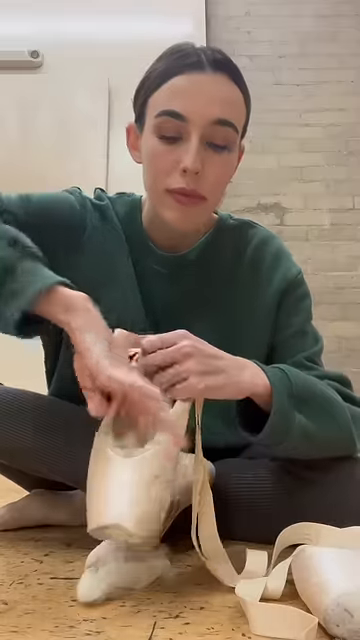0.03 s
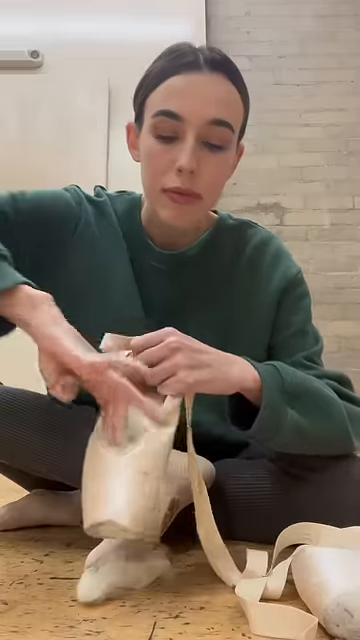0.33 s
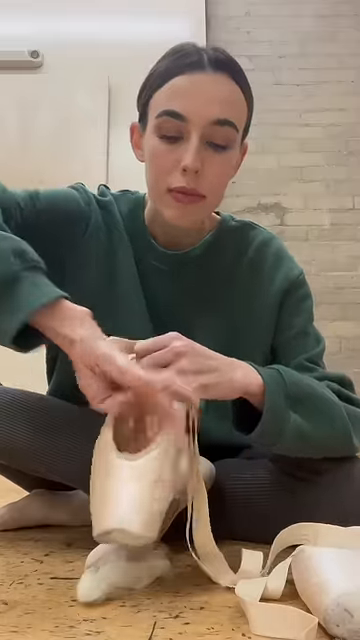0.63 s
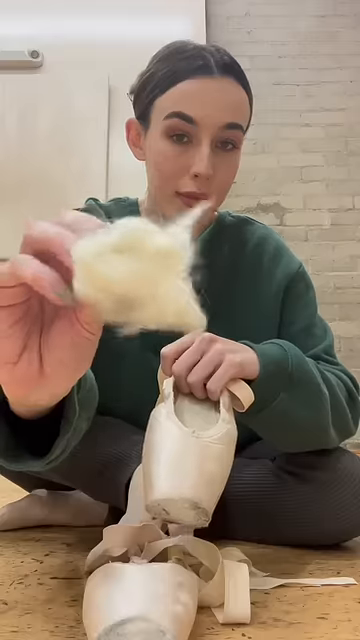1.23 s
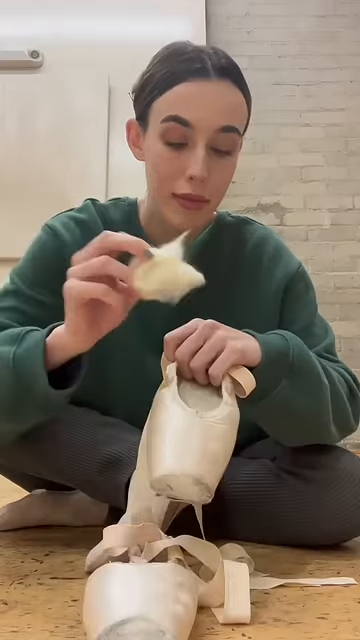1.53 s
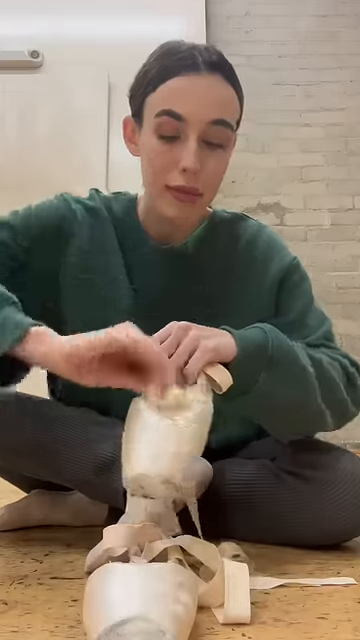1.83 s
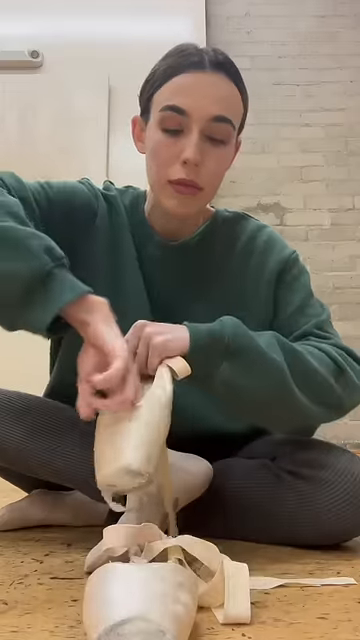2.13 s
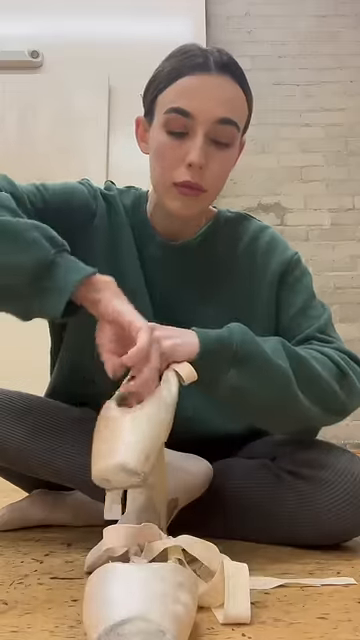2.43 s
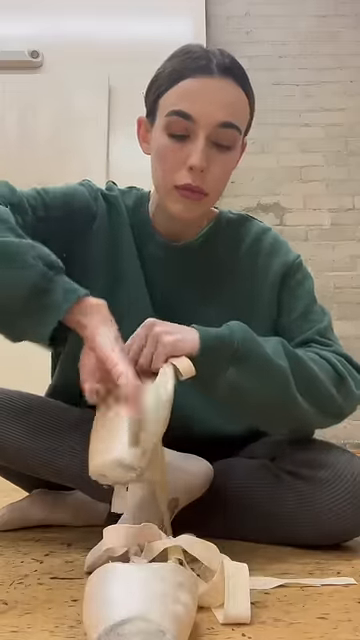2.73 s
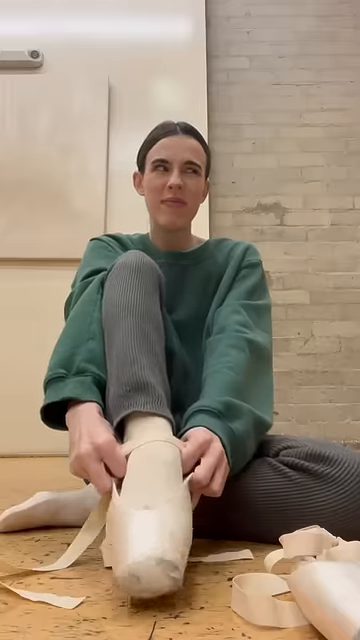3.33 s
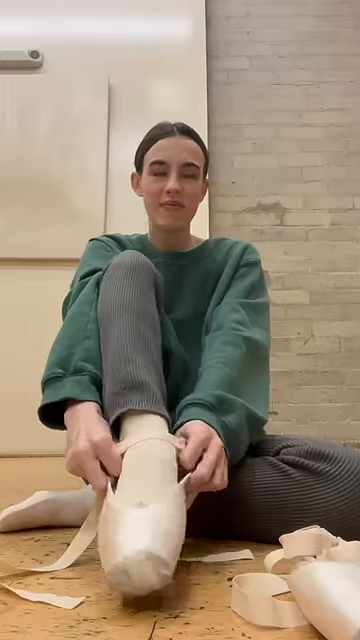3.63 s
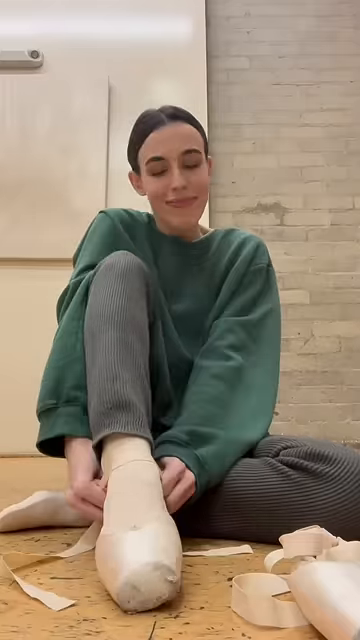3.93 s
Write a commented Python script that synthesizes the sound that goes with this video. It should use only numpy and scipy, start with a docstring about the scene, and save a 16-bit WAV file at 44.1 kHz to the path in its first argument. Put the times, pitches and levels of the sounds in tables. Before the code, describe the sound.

Close, soft rubbing and rustling comes in two spells as hands press wool into a hollow ballet shoe. Faint creaks and one low knock on floorboards follow, over the throbbing ventilation hum of a quiet room.

```python
"""Two ventilation motors hum and slowly throb while a dancer on a studio floor handles a satin pointe shoe.
Her fingers rub inside it and press wool into its hollow toe box; sleeves rustle, fingertips bump and squeak.
After a lull she rubs again. She pulls the shoe on, the fabric creaks, and the toe knocks once on the floor.
About once a second the whole sound dips briefly, and the hum comes back at another point in its throb."""
import sys
import numpy as np
from scipy import signal
from scipy.fft import rfft, irfft
from scipy.io import wavfile

SR = 44100
rng = np.random.default_rng(int(sys.argv[2]) if len(sys.argv) > 2 else 0)


def wav_out(sig):
    """Save sig, one row per channel (or a flat mono array), as 16-bit PCM at SR to the path in sys.argv[1]."""
    wavfile.write(sys.argv[1], SR, np.round(np.clip(np.atleast_2d(sig).T, -1, 1) * 32767).astype(np.int16))


N = 176400
TIME, FREQ = np.arange(N) / SR, np.fft.rfftfreq(N, 1 / SR)
FINGER_GRIP = dict(slips_per_s=900, spread_db=1, wash=0.41)
CLOTH_GRIP = dict(slips_per_s=2500, spread_db=0.5, wash=0.75)
# The stretches of sound between the dips: start_s, weakest_hum_s
STRETCHES = [(0, .47), (1.037, 1.65), (1.901, 2.5), (2.9, 3.08), (3.871, 4.33)]


def amp(db):
    """Turns decibels into a number to multiply by."""
    return 10 ** (np.asarray(db) / 20)


def evened(x):
    """Scales a sound to an average strength (rms) of 1."""
    return x / np.sqrt(np.mean(x ** 2) + 1e-20)


def curve(points):
    """Joins (frequency, value) points into a value for every frequency."""
    hz, value = np.transpose(points)
    return np.interp(np.log(FREQ + 1), np.log(hz), value)


def colour(x, tone):
    """Makes some frequencies stronger and others weaker, then evens the level."""
    return evened(irfft(rfft(x) * amp(curve(tone)), N))


def add(mix, start_s, sound):
    """Mixes a sound in at the given time."""
    part = mix[..., max(round(start_s * SR), 0):][..., :sound.shape[-1]]
    part += sound[..., :part.shape[-1]]


def resonate(x, hz, width_hz):
    """Keeps the sound near one pitch; filtering twice cuts the rest more sharply."""
    b, a = signal.iirpeak(hz, hz / width_hz, SR)
    return evened(signal.lfilter(b, a, signal.lfilter(b, a, x)))


def wander(step_s):
    """A random curve that glides to a new value every step."""
    times = np.arange(0, N / SR, step_s)
    return np.interp(TIME, times, rng.standard_normal(N)[:len(times)])


def friction(slips_per_s, spread_db, wash):
    """Rubbing: two separate streams of tiny, uneven clicks over a wash of smooth noise."""
    size = amp(spread_db * np.minimum(rng.exponential(1, (2, N)), 4))
    slips = size * rng.choice([-1, 1], (2, N)) * (rng.random((2, N)) < slips_per_s / SR)
    return evened(evened(slips) + wash * rng.standard_normal((2, N)))


def pressure(length_s):
    """A touch presses for 32% of its length, holds, and lets go over the last 40%."""
    progress = np.linspace(0, 1, int(length_s * SR))
    ramp = np.minimum(progress / 0.32, (1 - progress) / 0.4)
    return np.sin(np.pi / 2 * np.clip(ramp, 0, 1))


def stretch_index():
    """Tells which stretch each moment belongs to."""
    return np.searchsorted(np.transpose(STRETCHES)[0][1:], TIME, "right")


def stereo(pair, likeness):
    """Turns a centre stream (row 0) and a side stream (row 1) into left and right."""
    # How far the left side's wave runs ahead: frequency_hz, lead_radians
    left_lead = [(100, .005), (2500, .07), (5000, 0), (6300, -.3), (8000, -.9), (10000, -1.7),
                 (11000, -2.2)]
    # How much louder the left side is: frequency_hz, level_db
    left_boost = [(60, 0.56), (700, 1.2), (1200, 0.3), (1750, -1.1), (2900, 0.78), (3600, 0.2)]
    same = np.clip(curve(likeness), -1, 1)
    centre, side = rfft(pair) * np.sqrt([(1 + same) / 2, (1 - same) / 2])
    tilt = amp(curve(left_boost) / 2) * np.exp(1j * curve(left_lead) / 2)
    return irfft(np.array([(centre + side) * tilt, (centre - side) / tilt]), N)


def finger_strokes():
    """Fingertips stick and slip: the satin hisses and rasps, and the hollow toe box rings."""
    # Rubs inside the shoe: start_s, length_s, box_db, box_pitch_hz, hiss_db
    strokes = [(0.0, 0.046, -52.5, 750, -59), (0.046, 0.027, -52.5, 790, -59),
               (0.067, 0.023, -55, 950, -65), (0.238, 0.07, -61.5, 800, -64),
               (0.294, 0.029, -55.5, 935, -69), (0.31, 0.034, -50.5, 777, -58),
               (0.329, 0.093, -49, 748, -55), (0.443, 0.096, -63.5, 735, -67),
               (0.521, 0.051, -58, 764, -60.5), (0.631, 0.029, -59.5, 670, -60.5),
               (0.706, 0.038, -58, 855, -84), (0.758, 0.055, -56, 610, -74), (0.819, 0.064, -57, 830, -63),
               (0.861, 0.058, -50.5, 727, -54), (0.905, 0.038, -55, 745, -54.5),
               (2.042, 0.037, -57.5, 790, -62.5), (2.191, 0.037, -62, 730, -63),
               (2.284, 0.023, -61, 744, -63.5), (2.353, 0.0254, -62.5, 690, -64.5),
               (2.396, 0.064, -60.5, 816, -68), (2.489, 0.028, -60.5, 920, -65.5),
               (2.508, 0.038, -54, 753, -59.5), (2.567, 0.09, -63, 750, -70), (2.694, 0.037, -59, 856, -61),
               (2.72, 0.027, -61, 724, -59), (2.785, 0.033, -62, 736, -77), (2.843, 0.03, -54, 790, -73),
               (2.872, 0.019, -55, 935, -62.5)]
    # The tone of rubbed satin: frequency_hz, level_db
    satin_tone = [(150, -28), (400, 9), (800, -15), (1300, 12), (1750, -17), (2200, 8.5), (2800, 8),
                  (3500, 3), (4500, 4), (5700, -1), (6800, 4.5), (9000, 1.5), (11000, -3)]
    grip_db, grip_s = 1.46, 0.009  # the finger's grip wavers
    slips = friction(**FINGER_GRIP) * amp(grip_db * wander(grip_s))
    fibres = friction(slips_per_s=1200, spread_db=3, wash=1) * amp(grip_db * wander(grip_s))
    hiss = colour(fibres, satin_tone)
    hollow = amp(-14) * resonate(friction(**FINGER_GRIP), hz=404, width_hz=340)  # the whole shoe
    rasp_pitches_hz = 4300 * (1 + 0.12 * rng.uniform(-0.77, 1, N))
    out = np.zeros((2, N))
    for (start_s, length_s, box_db, hz, hiss_db), rasp_hz in zip(strokes, rasp_pitches_hz):
        press = pressure(length_s)
        span = (round(start_s * SR) + np.arange(len(press))) % N
        rub = slips[:, span]
        box = resonate(rub, hz, width_hz=167) + 0.61 * resonate(rub, hz, width_hz=730)
        shoe = box / box.std(axis=1, keepdims=True) + hollow[:, span]
        rasp = amp(-11.5) * resonate(rub, rasp_hz, width_hz=650)  # the weave under a fingernail
        add(out, start_s, press * (amp(box_db) * shoe + amp(hiss_db) * (hiss[:, span] + rasp)))
    return out


def rustle():
    """Cloth fibres catch and let go, unevenly, as the arms move."""
    # How loudly sleeves, wool and ribbons move: time_s, level_db
    movement = [(0, -60.5), (.12, -65), (.22, -67.5), (.3, -63.5), (.42, -53), (.48, -59.5), (.56, -59.5),
                (.7, -61), (.77, -64.5), (.84, -57), (.93, -56.5), (1.01, -59.5), (1.06, -79),
                (1.18, -75.5), (1.26, -82), (1.38, -75), (1.64, -76), (1.77, -68.5), (1.85, -63),
                (1.92, -68), (1.96, -61.5), (2.01, -70.5), (2.08, -64.5), (2.14, -68), (2.22, -65),
                (2.46, -65.5), (2.55, -60.5), (2.67, -64.5), (2.76, -60.5), (2.86, -59.5), (2.94, -71.5),
                (3.05, -72.5), (3.3, -77), (3.39, -70), (3.5, -81.5), (3.57, -69.5), (3.74, -63.5),
                (3.8, -61), (3.84, -59), (3.89, -66), (4, -65.5)]
    # The tone of moving cloth: frequency_hz, level_db
    cloth_tone = [(150, -14), (350, 9.5), (700, 9), (1200, 1.5), (1600, 2.5), (2150, 7), (2900, 3),
                  (3600, -1.5), (4400, -2), (5100, -9.5), (5700, -3.5), (6600, -8), (9000, -8),
                  (11000, -10)]
    fibres = colour(friction(**CLOTH_GRIP), cloth_tone)
    flicker_db = 1.33 * wander(step_s=0.018)
    return fibres * amp(np.interp(TIME, *np.transpose(movement)) + flicker_db)


def ventilation():
    """Two motors at nearly the same speed take turns adding up and cancelling, so their hum throbs."""
    # Higher tones in the hum: pitch_hz, level_db
    overtones = [(118.4, -56), (177.6, -61.5), (236.9, -69)]
    hum_hz, throb_hz = 58.5, 1.46
    _, weakest_hum_s = np.transpose(STRETCHES)
    t = TIME - weakest_hum_s[stretch_index()]
    first_motor = amp(-45) * np.sin(2 * np.pi * hum_hz * t)
    second_motor = amp(-48) * np.sin(2 * np.pi * (hum_hz - throb_hz) * t)
    hum = first_motor - second_motor
    for hz, db in overtones:
        hum += amp(db) * np.sin(2 * np.pi * (hz * t + rng.random()))
    return np.sqrt(2) * hum  # makes each level the tone's average strength (rms)


def room_air():
    """The air in the room: a steady low rush with a faint hiss."""
    # The tone of the air: frequency_hz, level_db
    air_tone = [(20, -34.5), (45, 0.5), (70, 2), (110, 4.5), (150, -6), (230, -6.5), (330, -18.5),
                (500, -25.5), (800, -36.5), (1600, -35), (2100, -25), (2500, -39), (2900, -28),
                (3400, -48.5), (5000, -39.5), (10000, -42), (11500, -63)]
    return amp(-53.5) * colour(rng.standard_normal((2, N)), air_tone)


def with_bounces(x):
    """A sound arrives directly, then again from nearby surfaces."""
    # Bounces off floor, body and wall: delay_s, level_db
    bounces = [(.0031, -19.5), (.0074, -18), (0.0127, -24.5)]
    out = x.copy()
    for delay_s, db in bounces:
        add(out, delay_s, amp(db) * x)
    return out


def wall_echoes(x):
    """Bare walls add a faint, short tail of echoes, which stops at each dip."""
    t, stretch = TIME[:SR // 2], stretch_index()
    fade_s = 0.19  # time to fall by 60 dB
    tail = rng.standard_normal((2, len(t))) * amp(-60 * t / fade_s) * (t > 0.005)
    tail = amp(-8) * tail / np.linalg.norm(tail[0])
    out = np.zeros((2, N))
    for k in range(len(STRETCHES)):
        inside = stretch == k
        out += inside * signal.fftconvolve(x[:1] * inside, tail, axes=1)[:, :N]
    return out


def brushes():
    """Cloth and skin slide over the shoe, from a dull swish to a bright scuff."""
    # Sweeps of sleeve, hand, wool and ribbon: start_s, length_s, level_db, pitch_hz, width_hz
    sweeps = [(0.01, 0.16, -63, 333, 303), (0.094, 0.24, -74.5, 4500, 3000), (0.528, 0.052, -61, 4320, 800),
              (0.754, 0.33, -61, 430, 150), (0.887, 0.08, -57.5, 2300, 700), (1.08, 0.3, -66, 352, 290),
              (1.684, 0.17, -61.5, 263, 178), (1.715, 0.19, -73, 6500, 7040), (2.363, 0.24, -64, 280, 57),
              (2.51, 0.047, -65.5, 5500, 6000), (2.685, 0.18, -59.5, 278, 89),
              (2.76, 0.12, -70.5, 5840, 3500), (2.902, 0.13, -69, 2960, 1800),
              (3.37, 0.061, -77.5, 8350, 4000), (3.643, 0.28, -70, 7400, 5000)]
    out, slips = np.zeros((2, N)), friction(**CLOTH_GRIP)
    for start_s, length_s, db, hz, width_hz in sweeps:
        press = pressure(length_s)
        span = (round(start_s * SR) + np.arange(len(press))) % N
        add(out, start_s, amp(db) * press * resonate(slips[:, span], hz, width_hz))
    return out


def taps():
    """A fingertip lands and the toe box rings for a few vibrations."""
    # Fingertip bumps: start_s, level_db, pitch_hz
    bumps = [(.309, -41.5, 643), (.386, -39.5, 693), (.698, -43, 750), (2.721, -41, 730),
             (2.729, -36.5, 731), (2.852, -42, 845), (2.875, -39.5, 915)]
    # The tones of the toe box: pitch_multiple, level_db
    box_tones = [(1, -2.5), (.56, -19.5), (1.42, -15)]
    rise_s, decay_s = 0.001, 0.0034
    out, t = np.zeros((2, N)), TIME[:2048]
    shape = (1 - np.exp(-t / rise_s)) * np.exp(-t / decay_s)
    for start_s, db, hz in bumps:
        ring = sum(amp(tone_db) * np.sin(2 * np.pi * hz * ratio * t) for ratio, tone_db in box_tones)
        add(out[0], start_s, amp(db) * ring * shape / shape.max())
    return out


def squeaks():
    """For a moment the tiny slips fall into step and give a thin, wavering tone."""
    # Skin dragging on the lining: start_s, length_s, level_db, pitch_hz
    drags = [(0.389, 0.083, -67, 2237), (.533, 0.033, -63.5, 2495), (.68, 0.099, -62.5, 2115),
             (.68, 0.15, -67, 1515)]
    out, waver = np.zeros((2, N)), 1 + 0.006 * wander(step_s=0.008)
    for start_s, length_s, db, hz in drags:
        press = pressure(length_s)
        cycles = np.cumsum(hz * waver[round(start_s * SR):][:len(press)]) / SR
        add(out[0], start_s, amp(db) * press * evened(np.sin(2 * np.pi * cycles)))
    return out


def creaks():
    """Stretched satin slips in short, soft creaks as the shoe is pulled over the heel."""
    # Slips of the satin: start_s, level_db, pitch_hz
    slips = [(3.362, -58, 2820), (3.5405, -55.5, 2530), (3.5605, -49.5, 1300), (3.5785, -53, 1200),
             (3.594, -51, 1250), (3.606, -52.5, 1100), (3.6155, -56, 1400), (3.6325, -51, 1600)]
    rise_s, decay_s = 0.0008, 0.0022
    out, t = np.zeros((2, N)), TIME[:1024]
    shape = (1 - np.exp(-t / rise_s)) * np.exp(-t / decay_s)
    for start_s, db, hz in slips:
        hiss = rng.standard_normal((2, len(t)))
        add(out, start_s, amp(db) * shape * (resonate(hiss, hz, width_hz=1900) + 0.6 * hiss))
    return out


def toe_knock():
    """The hard toe ticks and thuds with a sinking pitch, the boards ring low, and the room booms back."""
    # The tones of the floorboards: pitch_hz, level_db, fade_s (time to fall by 60 dB)
    floor_tones = [(148.8, 2, 0.26), (244, -8, 0.51), (284.8, -10, 0.35), (363, -19, 0.13),
                   (636, -4, 0.048)]
    # The tone of the toe's first touch: frequency_hz, level_db
    tick_tone = [(300, 16.5), (1300, 4.5), (2100, 7), (3500, -23), (5500, 4), (7500, -12)]
    # The tone of the room's boom: frequency_hz, level_db
    boom_tone = [(70, -19), (160, 0), (400, -10), (520, -15.5), (760, -40), (1200, -37.5), (3000, -49.5)]
    start_s, wall_delay_s = 3.7625, 0.056
    high_hz, low_hz, sink_s = 487, 70, 0.0051
    thud_rise_s, thud_decay_s, tick_decay_s = 0.0024, 0.0095, 0.0024
    ring_rise_s, boom_rise_s, boom_fade_s = 0.0095, 0.012, 0.32
    out, t = np.zeros((2, N)), TIME[:SR // 2]
    cycles = np.cumsum(low_hz + (high_hz - low_hz) * np.exp(-t / sink_s)) / SR
    thud_shape = (1 - np.exp(-t / thud_rise_s)) * np.exp(-(t / thud_decay_s) ** 2)
    thud = -amp(-15.5) * np.sin(2 * np.pi * cycles) * thud_shape
    ring = sum(amp(db - 60 * t / fade_s) * np.sin(2 * np.pi * hz * t) for hz, db, fade_s in floor_tones)
    add(out[0], start_s, thud + amp(-24.5) * ring * (1 - np.exp(-t / ring_rise_s)))
    add(out[0], start_s + wall_delay_s, amp(-8.5) * thud)
    tick = colour(rng.standard_normal((2, N)), tick_tone)[:, :len(t)]
    add(out, start_s, amp(-40) * tick * np.exp(-t / tick_decay_s))
    boom = colour(rng.standard_normal((2, N)), boom_tone)[:, :len(t)]
    add(out, start_s, boom * amp(-28.5 - 60 * t / boom_fade_s) * (1 - np.exp(-t / boom_rise_s)))
    stretch = stretch_index()
    return out * (stretch == stretch[round(start_s * SR)])  # the ringing stops at the next dip


def scene():
    """Hands and shoe close by, the room and its ventilation behind."""
    # How alike left and right are for close sounds: frequency_hz, likeness (1 same, -1 opposite)
    near_likeness = [(100, 1), (800, .96), (1500, .62), (2300, .95), (2900, .76), (4100, .99), (4600, .92),
                     (5100, .45), (5600, .87), (10000, .82)]
    # The same for the room's sound: frequency_hz, likeness
    far_likeness = [(100, 1), (330, 0.9), (700, 0.037), (1200, -0.8), (2100, 1), (3000, -0.24),
                    (4000, 0.25), (5000, -0.56), (5700, 0.45), (10000, 0.78)]
    hands = with_bounces(finger_strokes() + taps() + squeaks() + brushes() + rustle()) + creaks()
    air = room_air()
    near = stereo(hands + toe_knock(), near_likeness)
    far = stereo(air + wall_echoes(hands), far_likeness)
    return near + far + ventilation()


def record(dry):
    """The level dips briefly between stretches, and the highest treble is cut away."""
    fade_out_s, fade_in_s, dip_gain, top_hz = 0.025, 0.032, 0.037, 11200
    ramps = [np.maximum((s - TIME) / fade_out_s, (TIME - s) / fade_in_s) for s, _ in STRETCHES[1:]]
    openness = np.minimum(np.min(ramps, axis=0), 1)
    gain = dip_gain + (1 - dip_gain) * openness ** 1.05
    treble_cut = signal.firwin(255, top_hz, window=("kaiser", 8), fs=SR)
    return signal.oaconvolve(dry * gain, treble_cut[None], "same")


dry = scene()
out = record(dry)
wav_out(out)
```